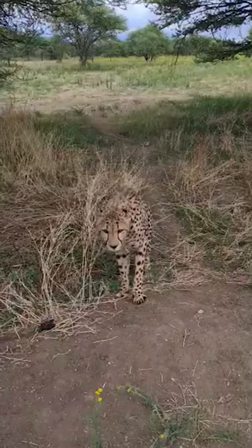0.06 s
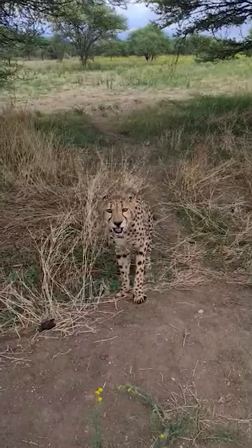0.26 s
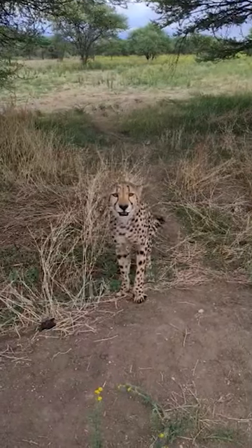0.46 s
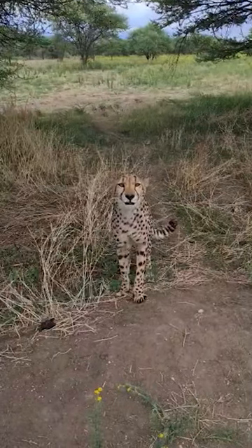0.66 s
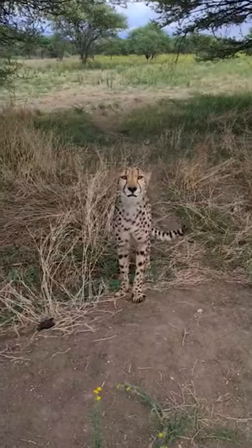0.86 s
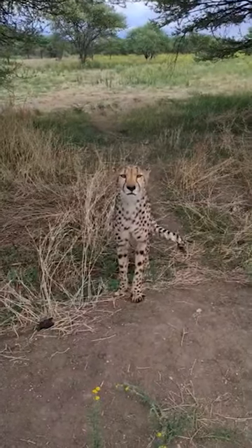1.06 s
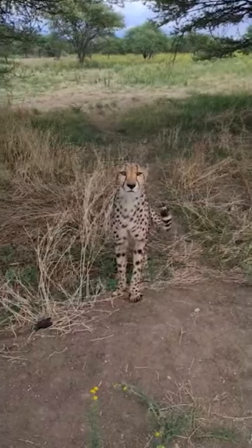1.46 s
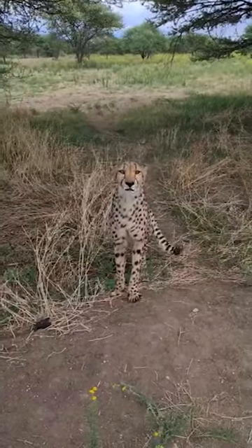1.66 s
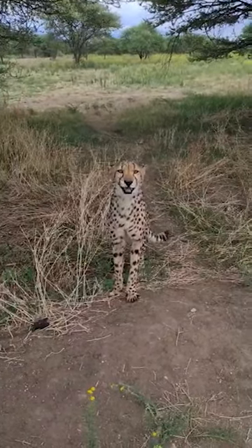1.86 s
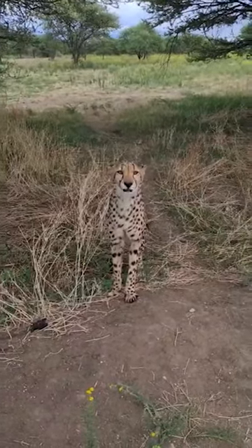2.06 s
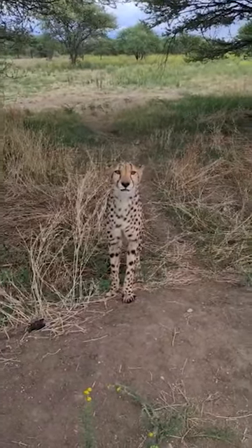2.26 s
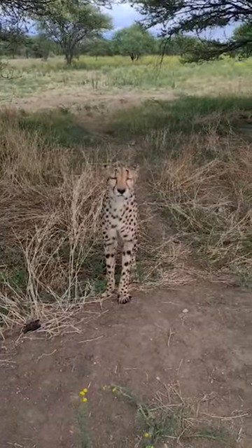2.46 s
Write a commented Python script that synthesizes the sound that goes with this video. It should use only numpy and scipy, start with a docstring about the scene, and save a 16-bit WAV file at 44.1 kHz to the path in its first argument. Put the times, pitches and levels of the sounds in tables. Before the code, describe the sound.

A cheetah a few metres away gives a drawn-out, high mew, pauses, then mews again. Behind it a small bird chips rapidly throughout, with a few faint distant whistles in very quiet open country.

```python
"""Very quiet open country: a high haze over a faint rumble of air, with far birds slurring downwards.
Almost at once a small bird starts a five-note chip and repeats it about six times a second throughout.
At 0.2 s a cheetah a few metres away gives a drawn-out mew, its mouth wide early on, then nearly closed.
The rumble swells briefly just before the second mew, at 1.7 s.
Grass and trees scatter a faint tail behind the calls."""
import sys
import numpy as np
from scipy import signal
from scipy.fft import rfft, irfft
from scipy.io import wavfile
from scipy.ndimage import uniform_filter1d

SR = 44100
rng = np.random.default_rng(int(sys.argv[2]) if len(sys.argv) > 2 else 0)


def persist_wave(psi):
    """Save psi, clipped to +-1, as 16-bit WAV."""
    counts = np.round(np.clip(psi, -1, 1) * 32767).astype(np.int16)
    wavfile.write(sys.argv[1], SR, np.atleast_2d(counts).T)


N = 110250


def undb(db):
    """Decibels to gain."""
    return 10 ** (np.asarray(db) / 20)


def curve(t, table):
    """Envelopes from breakpoints: one for each column after the time."""
    rows = np.array(table, float)
    return [np.interp(t, rows[:, 0], column) for column in rows.T[1:]]


def colour(hz, table):
    """Gain of an EQ curve at the given frequencies."""
    rows = np.array(table, float)
    return undb(np.interp(np.log(np.maximum(hz, 1)), np.log(rows[:, 0]), rows[:, 1]))


def tint(x, table):
    """Put a sound through an EQ curve."""
    return irfft(rfft(x) * colour(np.fft.rfftfreq(N, 1 / SR), table), N)


def noise(table):
    """Coloured noise of rms 1."""
    coloured = tint(rng.standard_normal(N), table)
    return coloured / coloured.std()


def walk(rate_hz):
    """Smooth random modulation of spread 1 that turns about rate_hz times a second."""
    hold = max(int(SR / rate_hz), 2)
    steps = np.repeat(rng.standard_normal(N // hold + 1), hold)
    drift = uniform_filter1d(steps, hold)[:N]
    return drift / drift.std()


def place(x, pan_db, lag_s):
    """Stereo position: negative pan_db favours the right channel, which hears lag_s later."""
    late = irfft(rfft(x) * np.exp(-2j * np.pi * np.fft.rfftfreq(N, 1 / SR) * lag_s), N)
    return np.array([x * undb(pan_db / 2), late * undb(-pan_db / 2)])


def scatter(x, t60_s, gap_s):
    """Diffuse echoes from the vegetation, different in each ear."""
    t = np.arange(SR) / SR
    tail = rng.standard_normal((2, SR)) * np.exp(-np.log(1000) * t / t60_s) * (t > gap_s)
    tail /= np.sqrt(np.sum(tail ** 2, axis=1, keepdims=True))
    return signal.fftconvolve(x[None], tail, axes=1)[:, :N]


def country():
    """The bed: a high haze of distant birds and insects over a rumble of air that swells once."""
    # Colours of the haze and the rumble. Each row: frequency in Hz, relative level in dB.
    haze_eq = [(25,-20),(250,-17),(500,-16.5),(1200,-6.5),(1750,-12),(2600,-13),(3300,-5.5),(4200,-14),(5200,-4.5),(5900,-13.5),(7000,-12.5),(7800,-19.5),(9500,-36),(15000,-43.5)]
    rumble_eq = [(15,-9.5),(28,-8),(50,-4),(72,-4),(105,-9.5),(160,-15),(300,-25.5),(700,-46)]
    haze_db, rumble_db, side_db = -74, -86.5, -9.5
    swell_at_s, swell_width_s, swell_db = 1.635, .035, 17
    haze = np.array([noise(haze_eq), noise(haze_eq)]) * undb(haze_db + walk(rate_hz=18))
    swell = np.exp(-((np.arange(N) / SR - swell_at_s) / swell_width_s) ** 2)
    rumble = noise(rumble_eq) + undb(side_db) * noise(rumble_eq) * np.array([[1], [-1]])
    return haze + rumble * undb(rumble_db + swell_db * swell)


def add_whistle(out, start_s, length_s, pitches, db):
    """Mix in one soft-edged bird note that glides through three pitches, turning a quarter of the way."""
    edge_s, octave_db = max(.0011, length_s / 10), -41
    span = np.arange(max(int(start_s * SR), 0), min(int((start_s + length_s) * SR), N))
    progress = np.clip((span / SR - start_s) / length_s, 0, 1)
    hz = np.interp(progress, [0, .25, 1], pitches)
    ramp = np.clip(np.minimum(progress, 1 - progress) * length_s / edge_s, 0, 1)
    phase = 2 * np.pi * np.cumsum(hz) / SR
    tone = np.sin(phase) + undb(octave_db) * np.sin(2 * phase)
    out[span] += undb(db) * np.sin(np.pi / 2 * ramp) ** 2 * tone


def far_birds():
    """Single slurred whistles, half lost in their echo."""
    # Each row: start and length in seconds, opening, turning and closing pitch in Hz, level in dB.
    slurs = [(-.02,0.058,4100,3890,3344,-63.5),(0.1,0.0354,3100,2970,2010,-69),(.618,.037,6870,4860,3764,-59),(.932,0.016,4140,3250,2725,-57),(0.961,.03,2620,2423,2384,-60.5),
             (1.07,0.032,7534,7640,8040,-76),(1.112,0.0077,4340,3434,2696,-63),(1.395,0.3,7750,7750,7460,-77.5),(2.264,0.32,7980,7680,7260,-77.5)]
    dry = np.zeros(N)
    for start_s, length_s, *pitches, db in slurs:
        add_whistle(dry, start_s, length_s, pitches, db)
    return dry + undb(2.5) * scatter(dry, t60_s=0.21, gap_s=0.0013)


def chipping_bird():
    """The same quick figure over and over, opening on a soft hiss and smeared by the bush and trees."""
    # The chips. Each row: start in seconds, base level in dB, stretch factor on the note spacing.
    chips = [(0.056,-36,0.86),(0.2064,-35.5,1),(0.3547,-37.5,1.02),(0.5143,-36,1.03),(0.6667,-35.5,1.08),(0.8185,-35.5,1.05),(0.9759,-36,1.0),(1.1309,-40.5,1.04),
             (1.287,-38.5,1.1),(1.4438,-39.5,1.02),(1.5996,-44,1.42),(1.7604,-43,0.91),(1.917,-42.5,1.08),(2.081,-42.5,1.1),(2.248,-40,1.05),(2.4067,-42.5,1.07)]
    # The notes of a chip. Each row: unstretched offset and length in seconds,
    # opening, turning and closing pitch in Hz before the sag, relative level in dB.
    notes = [(0,.0035,6300,7100,6900,-5),(.0045,.003,6300,5300,3100,-8),(.0172,.0105,3700,4650,4050,-7),(.0332,.0028,5500,4900,3900,-5),(.0405,.009,4300,5420,5120,1)]
    # Colour of the hiss. Each row: frequency in Hz, relative level in dB.
    hiss_eq = [(2500,-33.5),(3200,-6.5),(4500,-15),(5800,1),(6600,0.5),(7400,-18),(8100,-23.5),(9500,-41)]
    note_trim_db, sag_per_s = 2.5, .011
    hiss_db, hiss_lead_s, hiss_rise_s, hiss_fall_s = -19, 0.00067, .02, .025
    t, dry, hiss_envelope = np.arange(N) / SR, np.zeros(N), np.zeros(N)
    accents_db = rng.standard_normal((len(chips), len(notes)))
    for (start_s, chip_db, stretch), accents in zip(chips, accents_db):
        since = t - start_s + hiss_lead_s
        puff = np.exp(-np.maximum(-since / hiss_rise_s, since / hiss_fall_s))
        hiss_envelope += undb(chip_db + hiss_db) * puff
        sag = 1 - sag_per_s * start_s  # each chip sits a touch lower than the last
        for (offset_s, length_s, *pitches, note_db), accent_db in zip(notes, accents):
            db = note_trim_db + chip_db + note_db + accent_db
            add_whistle(dry, start_s + offset_s * stretch, length_s, np.array(pitches) * sag, db)
    hiss = hiss_envelope * np.array([noise(hiss_eq), noise(hiss_eq)])
    bush = undb(-6) * scatter(dry, t60_s=0.085, gap_s=0.006)
    trees = undb(-21.5) * scatter(dry, t60_s=0.42, gap_s=0.0097)
    return place(dry, pan_db=-1.7, lag_s=.00005) + hiss + bush + trees


def mew(contour, ring_hz):
    """Vocal-fold harmonics coloured by the mouth; rasp shakes them and turns overtones into pulsed air."""
    # Mouth opening and vocal roughness. Each row: time in seconds, amount from 0 to 1.
    mouth_moves = [(.19,0.76),(.25,0.73),(.3,0.4),(.35,0.27),(.5,.05),(.8,0.25),(1.665,0.1),(1.73,1),(1.8,0.96),(1.85,0),(2.0,0),(2.25,0.43)]
    rasp_moves = [(.19,.55),(.24,.3),(.275,.05),(.72,.05),(.78,.2),(.825,.75),(1.665,.35),(1.71,.25),(1.728,.75),(1.742,.1),(1.86,.05),(2.11,.05),(2.19,.2),(2.24,.65)]
    # Colours of the wide mouth, the nearly shut mouth and the breath.
    # Each row: frequency in Hz, relative level in dB.
    wide_eq = [(1300,-9),(1650,1),(2000,-2),(2300,-9),(2700,-5),(3300,-4),(3900,-7),(4400,-10),(5600,-7),(6600,-14),(7700,-23),(8300,-46),(10500,-38),(13000,-41),(15500,-54)]
    shut_eq = [(1300,5),(1580,-4.5),(2050,-0.5),(2125,-12),(2400,-10.5),(2660,-11),(3100,-17),(3600,-31),(5200,-20),(7400,-34.5),(8100,-58.5),(13000,-52.5),(15500,-59)]
    breath_eq = [(400,-8.5),(1100,1.5),(1700,-6.5),(2300,-5),(3000,0.5),(3800,-16.5),(6000,-23),(7500,-22.5),(8800,-38.5),(15000,-36.5)]
    jitter, shimmer, shake_hz, hoarseness = .022, 0.083, 258.9, 0.85
    overtone_trim_db, wander_db, breath_db = 1.5, 3, -6.5
    ring_db, ring_half_width_hz, fade_s = 10.5, 280, .008
    t = np.arange(N) / SR
    hz, first_db, second_db, overtone_db = (uniform_filter1d(c, size=220) for c in curve(t, contour))
    mouth, rasp = curve(t, mouth_moves)[0], curve(t, rasp_moves)[0]
    inside_s = np.minimum(t - contour[0][0], contour[-1][0] - t)
    gate = np.sin(np.pi / 2 * np.clip(1 + inside_s / fade_s, 0, 1)) ** 2
    on = gate > 0
    phase = 2 * np.pi * np.cumsum(hz * (1 + jitter * rasp * walk(shake_hz))) / SR
    voice = undb(first_db) * np.sin(phase) + undb(second_db) * np.cos(2 * phase)
    overtone_gain = undb(overtone_db + overtone_trim_db)
    clear_gain = overtone_gain * (1 - hoarseness * rasp ** 2)
    for harmonic in range(3, 30):
        partial_hz = harmonic * hz[on]
        ring = undb(ring_db / (1 + ((partial_hz - ring_hz) / ring_half_width_hz) ** 2))
        wide = colour(partial_hz, wide_eq) * ring
        vowel = wide ** mouth[on] * colour(partial_hz, shut_eq) ** (1 - mouth[on])
        wander = undb(wander_db * walk(rate_hz=25.56)[on])
        partial = np.sin(harmonic * phase[on] + rng.uniform(0, 2 * np.pi))
        voice[on] += clear_gain[on] * vowel * wander * partial
    breath = noise(breath_eq) * (1 + np.cos(phase)) * overtone_gain * rasp * undb(breath_db)
    flutter = 1 + shimmer * rasp * walk(shake_hz)
    return np.sqrt(2) * gate * (voice * flutter + breath)


def cheetah():
    """Two mews; grass nearby and trees farther off throw back mostly the overtones."""
    # One contour per mew. Each row: time in seconds, pitch in Hz,
    # then base levels in dB of the fundamental, the second harmonic and the overtones above.
    contours = [
        [(0.186, 480, -43, -77, -83), (0.198, 412.3, -31, -47.5, -57.5), (0.226, 467, -23.5, -44, -52.5),
         (0.264, 544, -28.5, -28, -42), (0.294, 557.8, -28.5, -27, -37.5), (0.34, 534.3, -31, -36.5, -52.5),
         (0.362, 600.3, -39.5, -46.5, -63), (0.41, 577, -41.5, -56, -65), (0.472, 598, -39, -48, -64),
         (0.508, 521.5, -30, -33.5, -47.5), (0.526, 519.5, -30, -34.5, -49.5),
         (0.658, 539.4, -28.5, -32, -48.5), (0.734, 517.4, -27, -30, -44), (0.756, 499.2, -22, -34, -53.5),
         (0.786, 516.2, -23, -42.5, -50), (0.806, 454, -24, -51.5, -51.5), (0.83, 438.4, -33, -58.5, -62.5),
         (0.84, 453, -54, -62.5, -64.5)],
        [(1.661, 526, -55.5, -67.5, -63.5), (1.669, 479, -30.5, -43.5, -54.5), (1.677, 452.4, -25, -43, -60.5),
         (1.695, 487.7, -24.5, -33.5, -43.5), (1.719, 557, -29, -21.5, -45), (1.729, 634.4, -39, -36.5, -43.5),
         (1.749, 656.7, -41, -35, -43.5), (1.771, 646.7, -39, -41, -46.5), (1.813, 578.3, -39.5, -32, -57),
         (1.841, 536, -32, -31.5, -55), (1.893, 529.6, -32.5, -35, -56.5), (2.025, 514.3, -29, -32.5, -48),
         (2.101, 507, -28, -34, -47.5), (2.155, 475.7, -23, -37.5, -52.5), (2.193, 488, -24, -45.5, -54),
         (2.219, 434, -26, -55.5, -66.5), (2.245, 413.8, -31.5, -53, -66.5), (2.272, 436, -52, -78, -83)],
    ]
    # Where the wide mouth rings: one frequency in Hz per mew.
    rings_hz = [3250, 3700]
    # The roll-off below the fundamental and the colour that vegetation returns.
    # Each row: frequency in Hz, gain in dB.
    low_cut = [(180,-30),(300,-20),(410,0)]
    vegetation_eq = [(420,-18),(600,-10),(900,-9),(1400,-1.5),(3000,5.5),(8000,2)]
    mews = sum(mew(contour, ring_hz) for contour, ring_hz in zip(contours, rings_hz))
    dry = tint(mews, low_cut)
    send = tint(dry, vegetation_eq)
    grass = undb(-12) * scatter(send, t60_s=.06, gap_s=0.0032)
    trees = undb(-19) * scatter(send, t60_s=.5, gap_s=0.02)
    return place(dry, pan_db=-4, lag_s=.00008) + grass + trees


def scene():
    """The cheetah in front, birds and country behind."""
    return cheetah() + chipping_bird() + far_birds() + country()


def record(dry):
    """A steep low-pass takes off the very top."""
    cutoff_hz = 15800
    return signal.sosfilt(signal.ellip(8, .2, 70, cutoff_hz, fs=SR, output="sos"), dry)


dry = scene()
out = record(dry)
persist_wave(out)
```